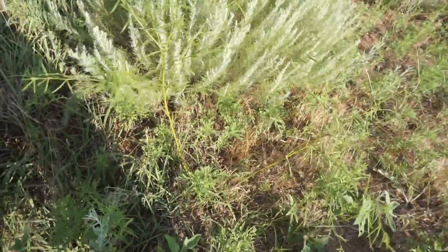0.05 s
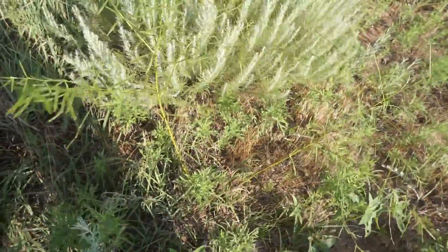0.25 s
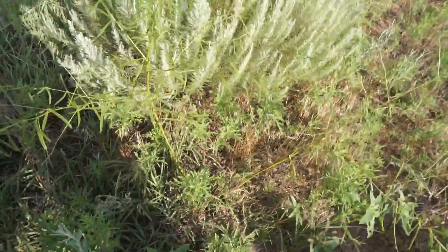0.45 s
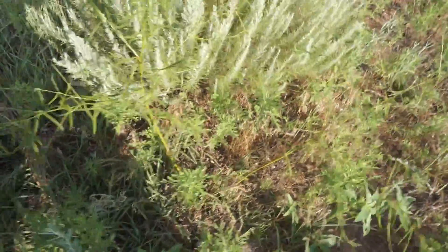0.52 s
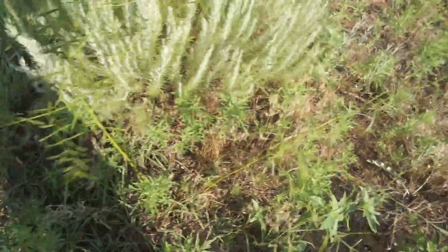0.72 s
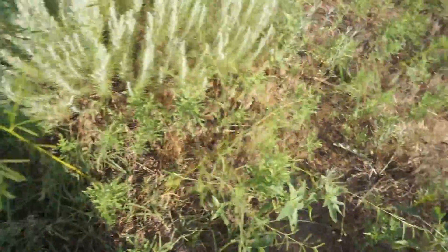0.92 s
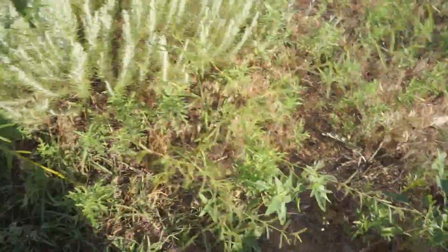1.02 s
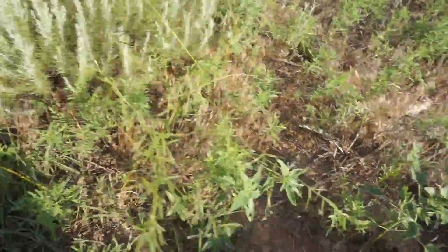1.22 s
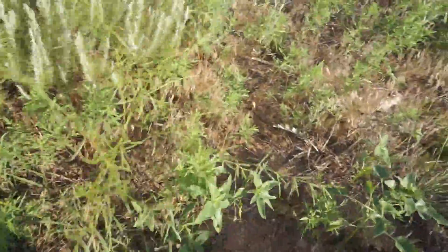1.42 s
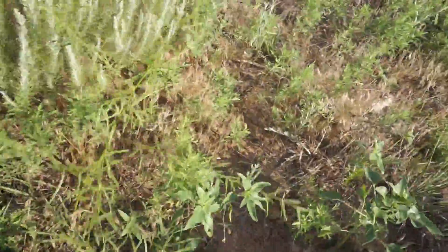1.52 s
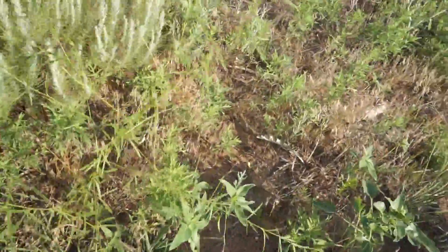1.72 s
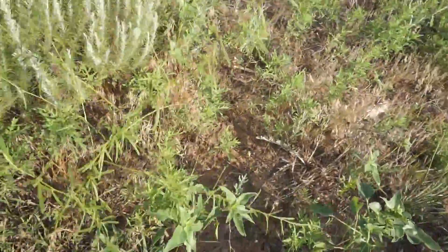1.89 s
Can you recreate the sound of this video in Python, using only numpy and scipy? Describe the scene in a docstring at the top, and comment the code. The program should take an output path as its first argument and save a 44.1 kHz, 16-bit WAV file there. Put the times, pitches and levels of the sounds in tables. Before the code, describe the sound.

A close bush cricket gives four short, very high buzzes at about 0.2, 0.7, 1.2 and 1.6 seconds. A field cricket chirps slightly to the right at 0.1 and 0.5 seconds. Light wind pops and rumbles on the microphone from 0.4 to 1.7 seconds, strongest around 0.7 and 1.3. Distant crickets trill and chirp faintly across the grassland throughout, and a fly hums faintly past near the end.

```python
"""Insects in dry grassland.

A close bush cricket gives four short, very high buzzes, each a file of wing teeth struck in a run.
A chorus trills further off, a field cricket chirps twice on the right and far ones answer.
Eddies of light wind pop on the microphone ports, grass rustles, and a fly hums faintly past."""
import sys
import numpy as np
from scipy import signal
from scipy.fft import rfft, irfft, next_fast_len
from scipy.io import wavfile
from scipy.ndimage import uniform_filter1d, map_coordinates

SR = 44100
rng = np.random.default_rng(int(sys.argv[2]) if len(sys.argv) > 2 else 0)


def store_wav(level_fs):
    """Save 16-bit WAV to argv[1]."""
    pcm = np.round(np.clip(np.atleast_2d(level_fs), -1, 1) * 32767)
    wavfile.write(sys.argv[1], SR, pcm.T.astype(np.int16))


N = 85995


def amp(db):
    """Decibels to gain."""
    return 10 ** (np.asarray(db) / 20)


def unit(x):
    """Scale to rms 1."""
    return x / np.sqrt(np.mean(x ** 2) + 1e-20)


def clock():
    """The time of each sample."""
    return np.arange(N) / SR


def along(points, hz):
    """Interpolate (Hz, value) points on a log axis."""
    f, v = np.transpose(points)
    return np.interp(np.log(hz + 1), np.log(f + 1), v)


def curve(rows):
    """Interpolate (s, value) points at each sample."""
    return np.interp(clock(), *np.transpose(rows))


def wobble(rate):
    """A smooth random curve, rate knots a second."""
    return map_coordinates(rng.standard_normal(4096), [clock() * rate], mode="wrap")


def filtered(x, response):
    """Apply a complex frequency response."""
    m = next_fast_len(N + SR // 2)
    return irfft(rfft(x, m) * response(np.fft.rfftfreq(m, 1 / SR)), m)[..., :N]


def ringing(x, spectrum, size=1024):
    """Minimum-phase colouring of pulses."""
    cepstrum = irfft(np.log(amp(along(spectrum, np.fft.rfftfreq(size, 1 / SR)))))
    cepstrum[1:size // 2] *= 2
    cepstrum[size // 2 + 1:] = 0
    ring = irfft(np.exp(rfft(cepstrum)))
    return signal.fftconvolve(x, ring / np.linalg.norm(ring))[:N]


def noise(spectrum, alike):
    """Stereo noise of rms 1 with a given left-right correlation."""
    def response(hz):
        angle = np.arccos(np.clip(along(alike, hz), -1, 1)) / 2
        return amp(along(spectrum, hz)) * [np.cos(angle), np.sin(angle)]
    mid, side = filtered(rng.standard_normal((2, N)), response)
    return unit(np.array([mid + side, mid - side]))


def place(x, pan_db, lag_s):
    """Left is louder by pan_db and earlier by lag_s."""
    half = np.array([[.5], [-.5]])
    return filtered(x, lambda hz: amp(half * pan_db) * np.exp(2j * np.pi * hz * half * lag_s))


def scatter(x, t60):
    """Diffuse return from stems and ground, different in each ear."""
    t = np.arange(SR // 4) / SR
    tail = rng.standard_normal((2, len(t))) * amp(-60 * t / t60)
    return signal.fftconvolve(x[None], tail / np.linalg.norm(tail[0]), axes=1)[:, :N]


def humps(rows):
    """Joint level of bell-shaped swells (centre s, length s, dB)."""
    t = clock()
    return np.sqrt(sum(amp(db) ** 2 * np.exp(-np.minimum(np.pi * ((t - s) / length) ** 2, 10 * 10))
                       for s, length, db in rows))


# Air spectrum. Each row: frequency in Hz, relative level in dB.
AIR_SPECTRUM = [(30, 12.5), (150, 18), (400, 4), (900, 3.5), (2000, -4.5), (3500, -5), (6500, -10.5),
                (10000, -1.5), (13000, -1.5), (16000, -4)]
# Air envelope. Each row: time in seconds, level in dB.
AIR_LEVEL = [(0, -62.5), (.3, -54.5), (.7, -55), (1.15, -52), (1.25, -56.5), (1.55, -52.5), (1.66, -57),
             (1.95, -53)]

def open_air():
    """Faint hiss, alike in both ears only in the bass."""
    return amp(curve(AIR_LEVEL)) * noise(AIR_SPECTRUM, [(100, 1), (1000, 0), (4000, 0)])


# Trilling crickets. Each row: pitch in Hz, pulses per second, relative level in dB, leftward pan in dB.
TRILLERS = [(4450, 79, 0.5, -3.5), (4684, 70, 7, -3), (4640, 64, -7, 7.5), (4240, 82, 0, -9)]
# Blur of far trills. Each row: frequency in Hz, relative level in dB.
BLUR_SPECTRUM = [(3000, -42), (3850, -12.5), (4100, -14), (4380, 5.5), (4620, 7.5), (4850, -14.5),
                 (5050, -15), (6000, -26.5)]
# Chorus envelope. Each row: time in seconds, gain in dB.
CHORUS_GAIN = [(0, -53), (.85, -50), (1.2, -51.5), (1.48, -50), (1.95, -52)]

def chorus():
    """Pulsed trills stand out of a blur of far ones."""
    trills = np.zeros((2, N))
    for hz, rate, db, pan_db in TRILLERS:
        beat = (np.cumsum(rate * (1 + .06 * wobble(25.29))) / SR + rng.random()) % 1
        phase = 2 * np.pi * np.cumsum(hz + 220 * (.5 - beat) + 55 * wobble(250)) / SR
        pulses = amp(db + 2.2 * wobble(44.9)) * np.sin(np.pi * beat) ** 4
        trills += place(pulses * np.sin(phase), pan_db, lag_s=rng.normal(-.00008, .00003))
    blur = noise(BLUR_SPECTRUM, alike=[(4500, .17)])
    return amp(curve(CHORUS_GAIN)) * (amp(2.5) * unit(trills) + amp(1.5) * blur)


PORT_LAG_S = .00098
# Spells of eddies from the left; otherwise from the right. Each row: start and end in seconds.
FROM_LEFT = [(.6, .74), (.84, .935)]

def pop(s, db, hz):
    """One eddy: a pressure swing reaches one port, then the other."""
    order = 2.6  # higher: more swings, less treble
    side = 1 if any(start < s < end for start, end in FROM_LEFT) else -1
    lag_s = side * PORT_LAG_S * (1 + .15 * rng.standard_normal())
    span = slice(max(round(s * SR) - SR // 20, 0), round(s * SR) + SR // 20)
    t = clock()[span] - s + np.array([[.5], [-.5]]) * lag_s
    rotation = np.exp(2j * np.pi * rng.random() + .3j * rng.standard_normal((2, 1)))
    swing = (1 - 2j * np.pi * hz * t / order) ** -(order + 1)
    return span, amp(db) * np.real(rotation * swing)


# Eddies before port colouring. Each row: time in seconds, peak in dB, centre in Hz.
EDDIES = [(0.016, -44.5, 130), (.212, -40, 130), (0.366, -24.5, 227), (0.378, -20.5, 204), (.392, -20, 268),
          (0.429, -20, 205), (0.452, -16.5, 192), (0.48, -16, 188), (0.496, -18, 142), (.550, -17, 183),
          (.567, -16, 188), (0.632, -14, 170), (.651, -7.5, 270), (.670, -6.5, 240), (.692, -9, 305),
          (0.7, -4.5, 271), (.705, -7.5, 220), (.726, -13.5, 166), (0.733, -12, 261), (0.754, -13.5, 266),
          (.802, -18, 194), (.828, -17, 210), (0.85, -13.5, 270), (0.856, -14.5, 284), (0.865, -15, 203),
          (0.892, -19, 270), (0.914, -14, 258), (0.924, -15, 208), (.929, -13.5, 323), (0.944, -23.5, 243),
          (.982, -15.5, 208), (.987, -11.5, 298), (1.088, -19.5, 150), (1.097, -19.5, 257),
          (1.114, -26.5, 193), (1.213, -29, 231), (1.274, -21, 232), (1.308, -9.5, 292), (1.317, -12, 232),
          (1.326, -9, 254), (1.389, -20, 192), (1.426, -27.5, 223), (1.519, -17, 232), (1.526, -16, 248),
          (1.569, -19.5, 158), (1.708, -20.5, 213), (1.908, -29.5, 130)]
# Port response. Each row: frequency in Hz, gain in dB.
PORT_COLOUR = [(130, -2.5), (250, 0), (470, 5.5), (750, -2), (1600, 6.5)]
# Breeze envelope. Each row: time in seconds, level in dB.
BREEZE = [(0, -70.5), (.25, -77.5), (.38, -35), (.5, -39.5), (.59, -47), (.68, -26.5), (.77, -38.5),
          (.87, -30), (.97, -40.5), (1.06, -51), (1.1, -35.5), (1.18, -68.5), (1.24, -63.5), (1.31, -27),
          (1.37, -46.5), (1.44, -42), (1.5, -48.5), (1.54, -39), (1.61, -57.5), (1.67, -64.5),
          (1.95, -50.5)]
# Breeze rumble. Each row: frequency in Hz, relative level in dB.
RUMBLE_SPECTRUM = [(25, -39), (70, 0.5), (150, 5.5), (300, -7), (600, -22), (1200, -34), (2500, -52)]
# Rumble across the ports. Each row: frequency in Hz, left-right correlation.
PORTS_ALIKE = [(60, 0.44), (130, 0.93), (300, 0.99), (700, 0.12), (2000, 0.18)]

def wind():
    """Separate eddies pop on the ports; a sputter of small ones and a soft rumble follow the breeze."""
    breeze_db = curve(BREEZE)
    small_per_s, small_hz = 150, 229
    onsets = np.flatnonzero(rng.random(N) < small_per_s / SR)
    size, pitch = rng.uniform(-.82, 1, (2, N))
    small = [(i / SR, breeze_db[i] + 6.5 + 4 * size[i], small_hz * 2 ** (pitch[i] / 2)) for i in onsets]
    rumble = amp(breeze_db + 1.93 * wobble(50)) * noise(RUMBLE_SPECTRUM + [(5000, -68)], PORTS_ALIKE)
    pops = np.zeros((2, N))
    for eddy in EDDIES + small:
        span, swing = pop(*eddy)
        pops[:, span] += swing
    return filtered(pops, lambda hz: amp(along(PORT_COLOUR, hz))) + place(rumble, 0, -PORT_LAG_S)


# Field cricket harmonics. Each row: multiple of the pitch, relative level in dB.
HARMONICS = [(1, 0), (2, -26), (3, -10)]

def wing_strokes(strokes, bend_hz, waver_hz):
    """Each wing stroke of a field cricket is a slightly rough tone that arches and falls."""
    t, song = clock(), np.zeros(N)
    waver = waver_hz * wobble(1200)
    for start, length, db, top_hz in strokes:
        on = (t > start) & (t < start + length)
        progress = (t[on] - start) / length
        hz = top_hz - bend_hz * (progress - .2) ** 2 + waver[on]
        phase = 2 * np.pi * np.cumsum(hz) / SR
        swell = np.abs(np.sin(np.pi * progress)) ** .91
        song[on] += sum(amp(db + level) * swell ** k * np.sin(k * phase) for k, level in HARMONICS)
    return song * amp(1.2 * wobble(900))


CLOSE_LAG_S = -.00007  # right ear first
# Close wing strokes. Each row: start and length in seconds, level in dB, top pitch in Hz.
NEAR_STROKES = [(.102, .018, -34, 5170), (.132, .021, -30.5, 5260), (.167, .021, -31, 5270),
                (.471, .013, -39, 4950), (.491, .02, -27, 5270), (.521, .022, -25, 5330),
                (.553, .021, -24, 5340)]
# Catches of the file. Each row: centre and length in seconds, level in dB.
FILE_CATCHES = [(.507, 0.0033, -50), (.554, 0.0023, -45)]

def near_field_cricket():
    """Two close chirps, scratchy where the file scrapes and catches."""
    tone = wing_strokes(NEAR_STROKES, bend_hz=950, waver_hz=35)
    scrape = (amp(-21) * tone + humps(FILE_CATCHES)) * rng.standard_normal(N)
    chirps = tone + filtered(scrape, lambda hz: hz ** 2 / (hz ** 2 + 2500 ** 2))
    return place(chirps, pan_db=-7, lag_s=CLOSE_LAG_S) + amp(-15) * scatter(chirps, t60=.04)


# Main wing resonance. Each row: fraction of its frequency, relative level in dB.
WING_SKIRT = [(.3, -64), (.6, -51), (.77, -24), (.85, -11), (.92, -4.5), (1, 2.5)]
# Wing response above it. Each row: frequency in Hz, relative level in dB when open, and when shut.
WING_TREBLE = [(13100, 6, -7.5), (14850, 8, 4), (16200, -24, -8.5)]

def wing_spectrum(shut):
    """The bush cricket's wing resonance sinks from open (0) to shut (1)."""
    open_hz, shut_hz = 12200, 9900
    resonance_hz = open_hz + shut * (shut_hz - open_hz)
    skirt = [(fraction * resonance_hz, db) for fraction, db in WING_SKIRT]
    treble = [(hz, open_db + (shut_db - open_db) * shut ** 2) for hz, open_db, shut_db in WING_TREBLE]
    return sorted(skirt + treble)


# Buzzes. Each row: end in seconds, drive level in dB, closing stroke in seconds, swell in seconds,
# opening stroke in dB relative to the drive level.
BUZZES = [(.276, -23.6, .068, .045, -24), (.772, -22.3, .071, .034, -21), (1.2205, -21.7, .0725, .027, -16),
          (1.657, -21.7, .07, .025, -13)]
# Tooth strikes. Each row: fraction of the closing stroke, teeth per second.
TOOTH_RATE = [(0, 570), (.2, 730), (0.449, 1300), (.68, 1130), (0.799, 490), (1, 570)]

def bush_cricket():
    """Wings scrape open, catch with a tick, then close: each tooth rings the wing, lower as it shuts."""
    swell_db, sag_db_per_s = 16.5, 82
    snap_db, snap_s = 3.5, .005  # last teeth strike harder
    open_lead_s, open_s, open_teeth_per_s, tick_lead_s = .015, .0065, 950, .0035
    t = clock()
    teeth, rasp, shut = np.zeros((3, N))
    for end, db, length, swell_s, open_db in BUZZES:
        start = end - length
        stroke = np.clip((t - start) / length, 0, 1) * (t < end)
        rise_db = -swell_db * np.clip(1 - (t - start) / swell_s, 0, 1) ** 1.7
        sag_db = sag_db_per_s * np.maximum(t - start - swell_s, 0)
        closing = amp(db + rise_db - sag_db + snap_db * (t > end - snap_s)) * (stroke > 0)
        opening = amp(db + open_db) * (t > start - open_lead_s) * (t < start - open_lead_s + open_s)
        force = closing + opening
        rate = np.where(t < start, open_teeth_per_s, np.interp(stroke, *np.transpose(TOOTH_RATE)))
        teeth_passed = np.cumsum(rate * (1 + .035 * wobble(700))) / SR
        hits = np.flatnonzero(np.diff(np.floor(teeth_passed)) > 0)
        strength = force * np.sqrt(SR / rate) * amp(.9 * rng.standard_normal(N))
        teeth[hits] += strength[hits]
        teeth[round((start - tick_lead_s) * SR)] += amp(db - 11) * np.sqrt(SR / open_teeth_per_s)
        rasp += force
        shut += stroke
    contact = uniform_filter1d(teeth, size=7) * np.sign(rng.standard_normal(N)) * (teeth == 0)
    drive = teeth + .8 * contact + amp(-11) * rasp * rng.standard_normal(N)
    wing = np.zeros(N)
    for position in np.linspace(0, 1, 6):
        crossfade = np.maximum(1 - abs(shut - position) / .2, 0)
        wing += ringing(drive * crossfade, wing_spectrum(position))
    stems = amp(-5) * scatter(wing, t60=.012) + amp(-19) * scatter(wing, t60=.09)
    return amp(-4) * place(wing + stems, pan_db=-5, lag_s=CLOSE_LAG_S)


# Far chirps. Each row: start in seconds, level in dB.
FAR_CHIRPS = [(0.207, -56.5), (0.717, -54), (0.979, -54.5), (1.267, -59.5), (1.53, -61), (1.799, -54)]

def far_field_crickets():
    """Answers of three drooping strokes each, dulled by the grass."""
    period_s, stroke_s, top_hz = .028, .019, 5540
    strokes = [(s + k * period_s, stroke_s, db, top_hz) for s, db in FAR_CHIRPS for k in range(3)]
    chirps = wing_strokes(strokes, bend_hz=1100, waver_hz=60)
    dulled = filtered(chirps, lambda hz: 1 / (1 + (hz / 9000) ** 6))
    return dulled + amp(-1) * scatter(dulled, t60=.08)


# Rustles. Each row: centre and length in seconds, level in dB.
RUSTLES = [(.257, 0.012, -57.5), (.295, 0.053, -67.5)]
# Rustle spectrum. Each row: frequency in Hz, relative level in dB.
RUSTLE_SPECTRUM = [(200, -32), (600, 7), (1200, 8.5), (2200, -16), (5000, -35)]

def grass():
    """Brushing grass gives two brief swells of noise."""
    return humps(RUSTLES) * noise(RUSTLE_SPECTRUM, alike=[(1000, 1)])


# Fly envelope. Each row: time in seconds, level in dB.
FLY_LEVEL = [(1.58, -81), (1.74, -52), (1.95, -58)]
# Wingbeat spectrum. Each row: frequency in Hz, relative level in dB.
FLY_SPECTRUM = [(156, 4), (312, 1.5), (470, -5), (900, -16), (1700, -24)]

def fly():
    """A faint wingbeat hum that sinks a little as it passes."""
    beat_hz, sag_hz_per_s, pass_s = 163.5, 23, 1.6
    hz = beat_hz - sag_hz_per_s * (clock() - pass_s) + 3 * wobble(40)
    phase = 2 * np.pi * np.cumsum(hz) / SR
    hum = sum(amp(along(FLY_SPECTRUM, k * beat_hz)) * np.sin(k * phase + 2 * np.pi * rng.random())
              for k in range(1, 12))
    return amp(curve(FLY_LEVEL)) * unit(hum)


def scene():
    """Insects, wind and grass over the hiss of open air."""
    background = open_air() + chorus() + wind()
    return background + near_field_cricket() + bush_cricket() + far_field_crickets() + grass() + fly()


def record(dry):
    """Brick-wall low-pass at 16.2 kHz."""
    return filtered(dry, lambda hz: hz < 16200)


dry = scene()
out = record(dry)
store_wav(out)
```